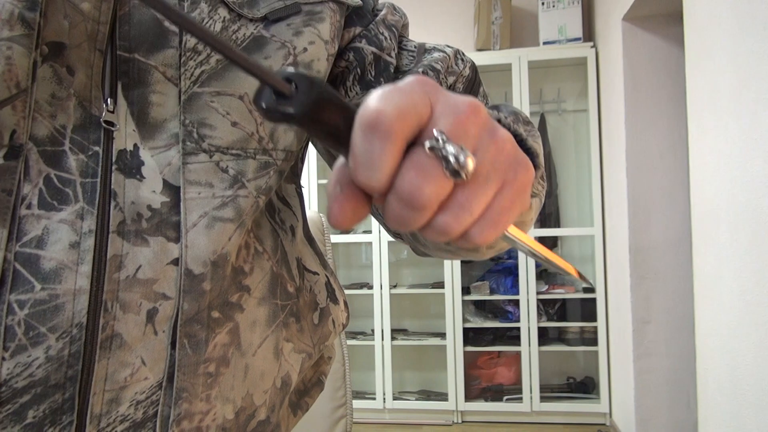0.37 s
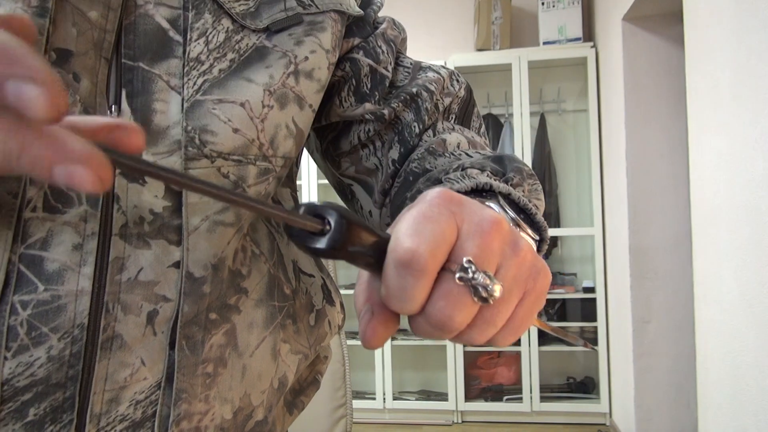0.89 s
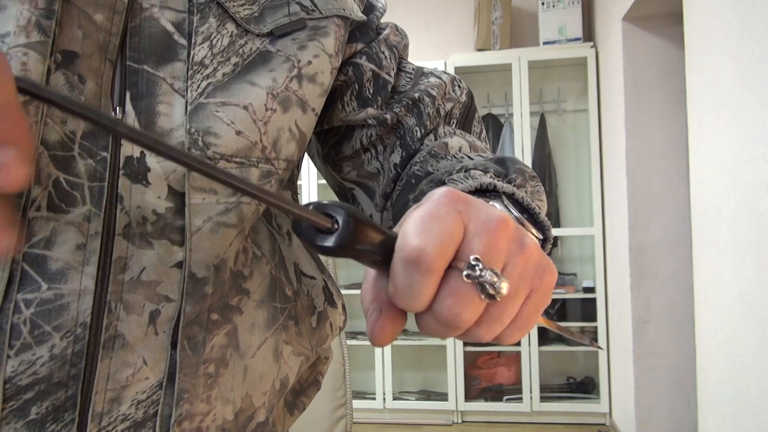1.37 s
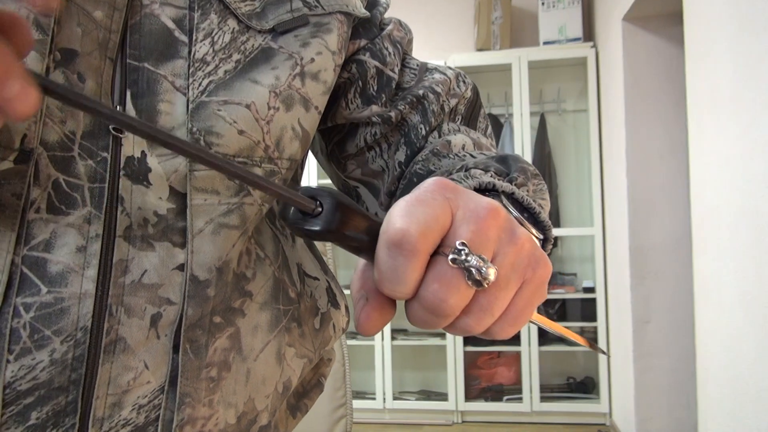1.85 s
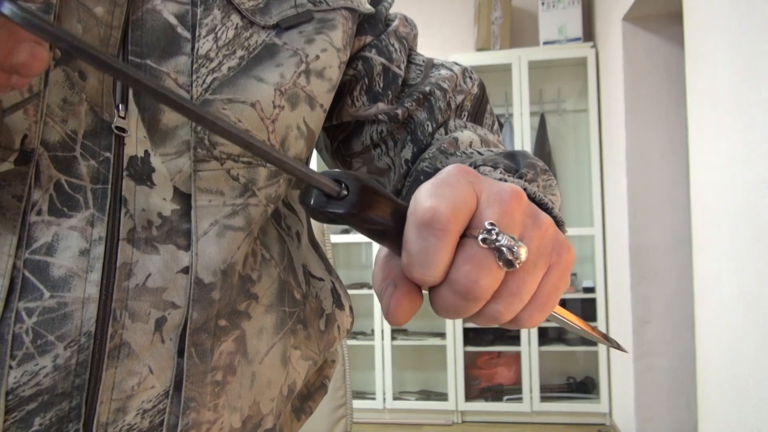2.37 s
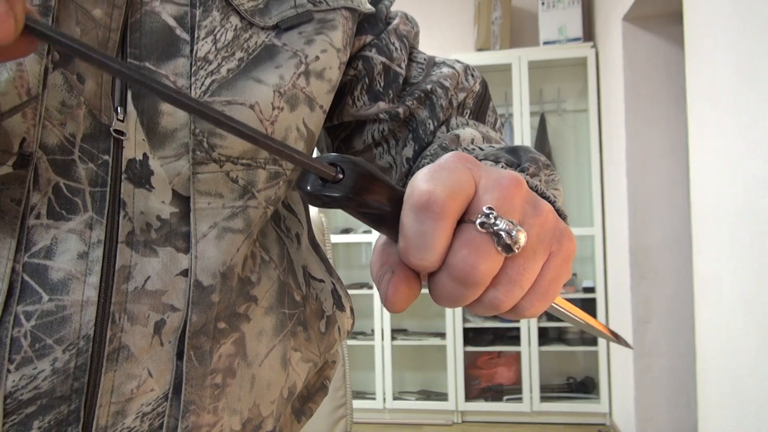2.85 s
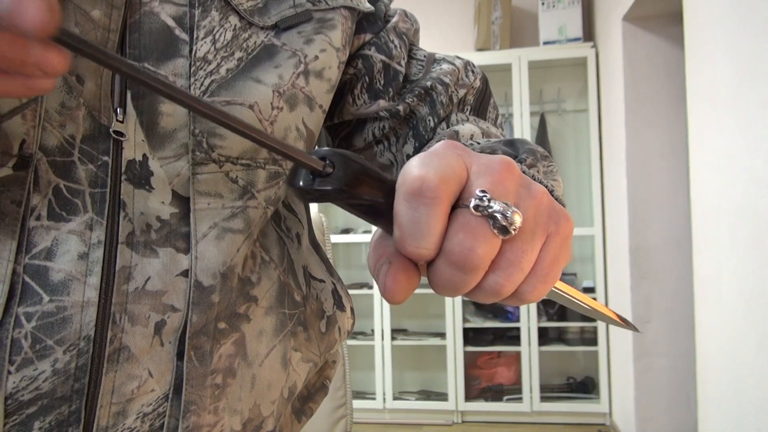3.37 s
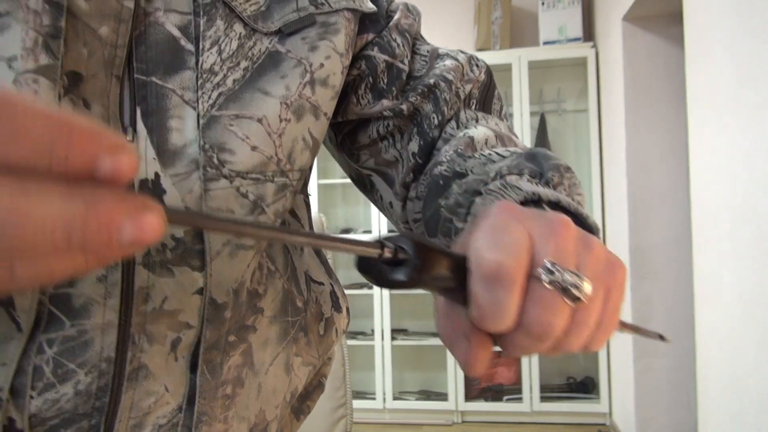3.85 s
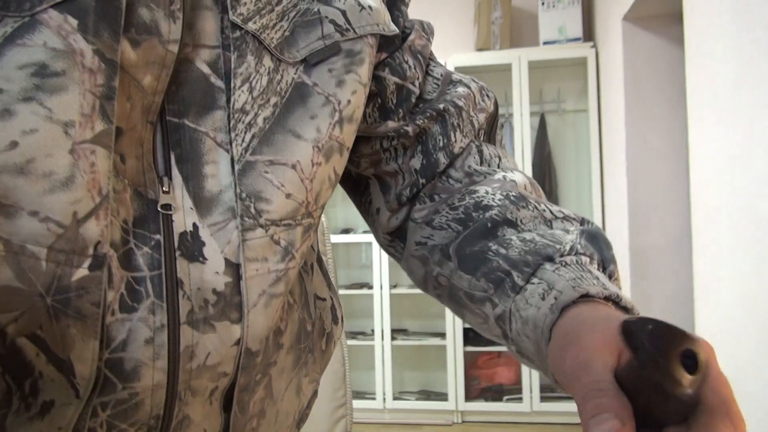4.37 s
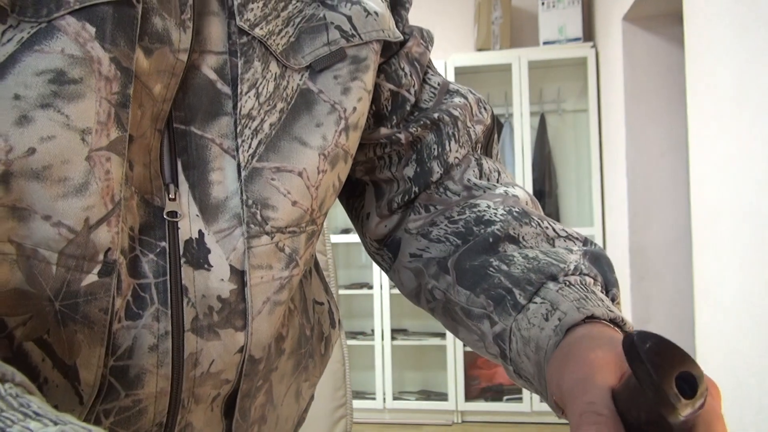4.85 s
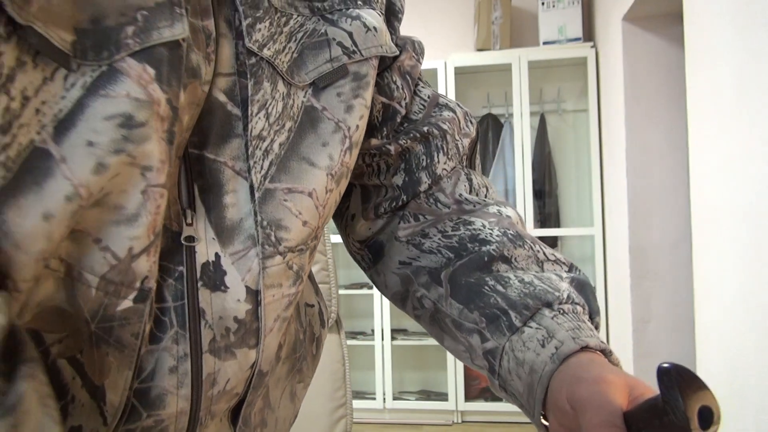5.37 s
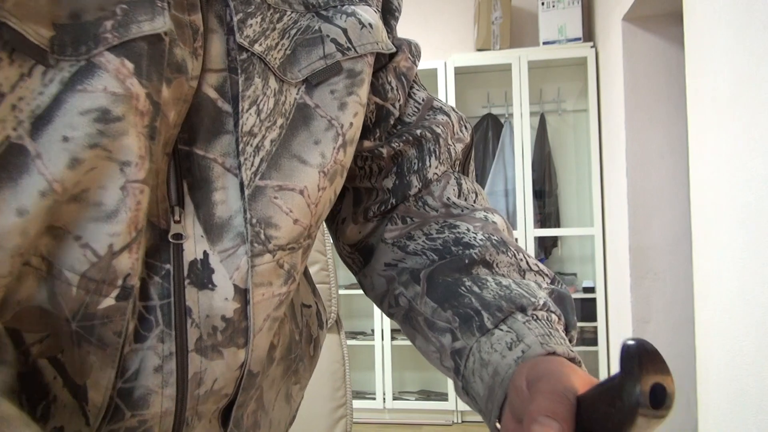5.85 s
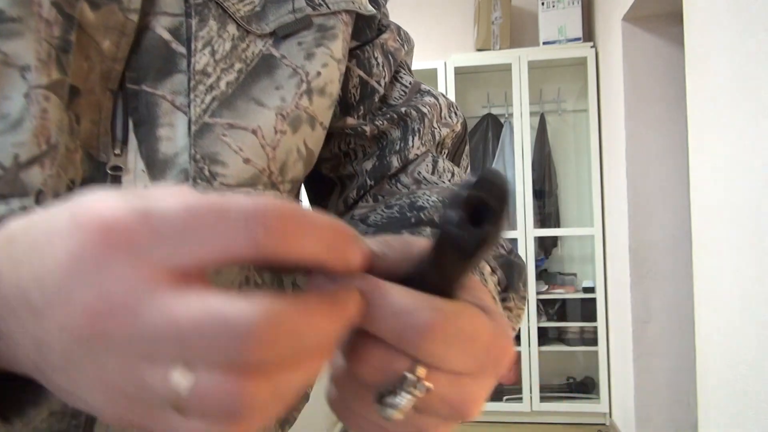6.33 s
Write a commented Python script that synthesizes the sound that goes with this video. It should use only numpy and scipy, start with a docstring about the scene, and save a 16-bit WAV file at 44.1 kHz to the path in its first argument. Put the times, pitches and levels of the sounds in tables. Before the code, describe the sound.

In a quiet indoor room with a steady low hum, a hex key turns in a bolt close to the microphone: tiny gritty scrapes, finger hiss and dry ticks, one clearly sharper. A thin squeak and a small ringing chink follow as it comes loose. A jacket sleeve swishes softly, then the key is laid on a wooden table with sudden loud knocks, scraping slides and short metallic ringing.

```python
"""Hands turn a long steel hex key in a bolt in a quiet room: room noise and hum lines last throughout.
First come scrapes (random grit through socket resonances), finger hiss and ticks (clicks with a short ring).
Near 3.9 s and 4.9 s a thin squeak joins, the later one with a chink of the loose key; from 5.1 s a jacket
sleeve swishes, as smooth filtered noise. From 5.5 to 6.05 s the key is laid on a wooden table: knocks and
slides shake the wood, each knock starts the steel's fading tones afresh, and two dull thumps lie below."""
import sys
import numpy as np
from scipy import signal
from scipy.fft import rfft, irfft
from scipy.io import wavfile
from scipy.ndimage import uniform_filter1d, minimum_filter1d

SR = 44100
rng = np.random.default_rng(int(sys.argv[2]) if len(sys.argv) > 2 else 0)


def master(y):
    """Save y as 16-bit WAV."""
    cut = np.clip(np.atleast_2d(y).T, -1, 1)
    pcm = np.round(cut * 32767)  # scale
    wavfile.write(sys.argv[1], SR, pcm.astype(np.int16))


def voltage_ratio(level):
    """Linear amplitude factor for a level in decibels (scalar or array-like)."""
    return 10 ** (np.asarray(level, float) / 20)


N = 285327

# colour of the room noise: f/Hz, relative level per Hz/dB
AIR_COLOUR = [(15, -39), (25, -9), (55, -1.5), (80, -6.5), (102, -2), (157, -1), (263, -12.5), (545, -20),
              (591, -28), (659, -21), (1020, -30), (1480, -30), (2690, -35), (5280, -34), (16000, -43.5)]
# hum of appliances: f/Hz, rms level/dB, width of the wavering part/Hz, steady share of the power/0-1
HUM_LINES = [(150.5, -49, 6.4, 0.66), (168.4, -53.5, 19, 0.86), (230.5, -60, 4.9, 0.03),
             (297.3, -58.5, 13.3, 0.59), (598.4, -62, 11, 0.92), (701, -68.5, 2.4, 0.9),
             (1164, -72.5, 14, 0.17), (1524, -65.5, 266, 0.02), (15622, -80, 3, 1)]
# how alike left and right noise are: f/Hz, likeness/0-1
LIKENESS = [(60, 0.98), (380, 0.97), (2380, 0.94), (15000, 0.9)]
# balance of noise and hum: f/Hz, left minus right/dB
BALANCE = [(60, -4.5), (380, 0.5), (2380, 1), (15000, 0.5)]
# colour of the jacket cloth: f/Hz, relative level/dB
CLOTH_COLOUR = [(800, -0.5), (2000, 1), (4000, -1.5), (6500, 2.5), (9000, -6), (16000, -18)]
# low thumps of the heavier knocks through the table frame: t/s, peak level of the swell/dB
KNOCK_THUMPS = [(5.797, -29), (5.935, -39)]
# strokes of key and rubbing fingers: start t/s, length/s, socket scrape level/dB, skin-on-steel hiss level/dB
STROKES = [(0.0, 0.02, -56, -54), (0.059, 0.026, -55, -66), (0.106, 0.022, -58, -80),
           (0.263, 0.061, -62, -58), (0.346, 0.05, -65, -60), (0.431, 0.058, -55, -55.5),
           (0.495, 0.086, -64, -66), (0.604, 0.055, -62, -78), (0.858, 0.051, -65, -59.5),
           (1.165, 0.021, -68, -70), (1.27, 0.032, -64, -75), (1.332, 0.16, -60, -57.5),
           (1.434, 0.027, -52, -50), (1.581, 0.056, -56, -56.5), (1.613, 0.11, -61, -67),
           (1.768, 0.1, -57.5, -61), (1.85, 0.105, -60.5, -64), (2.236, 0.14, -62.5, -65),
           (2.406, 0.083, -58.5, -59), (2.544, 0.03, -57, -62), (2.621, 0.081, -54, -51),
           (2.776, 0.079, -58.5, -59.5), (2.869, 0.16, -53.5, -67), (3.049, 0.084, -50, -59),
           (3.232, 0.035, -42.5, -54), (3.261, 0.069, -51.5, -56.5), (3.401, 0.046, -57, -58),
           (3.506, 0.048, -58.5, -80), (3.608, 0.044, -58.5, -80), (3.69, 0.083, -58.5, -79),
           (3.826, 0.18, -56, -66), (4.218, 0.19, -60.5, -66), (4.926, 0.057, -60, -57)]
# resonances of the key in the bolt head: f/Hz, width/Hz, relative level/dB
SOCKET_MODES = [(2450, 500, -4), (3100, 500, -9), (5440, 450, 2), (6800, 1800, -7)]
# thin squeaks of steel on steel: start t/s, length/s, level/dB, f/Hz
STEEL_SQUEAKS = [(3.862, 0.056, -54, 7750), (4.925, 0.057, -53, 7840)]
# ticks of the key in the bolt, the last a chink of the loose key:
# t/s, peak level of the click without its ring/dB, centre f/Hz
KEY_TICKS = [(0.449, -38, 2480), (1.603, -42, 3000), (2.646, -27, 5760), (2.796, -39, 7000),
             (2.9547, -39, 5400), (2.969, -28, 5530), (3.0757, -12.5, 5330), (3.0846, -26, 6500),
             (3.243, -37, 5500), (3.284, -34, 5400), (3.423, -28, 5130), (3.692, -37, 4600),
             (3.716, -41, 6000), (3.738, -31.5, 2300), (3.8017, -33, 3400), (3.871, -28.5, 7760),
             (4.9638, -30.5, 7600)]
# tones of the steel key: f/Hz, relative level/dB, time to fall 60 dB when free/s, family of vibration/0-2
KEY_MODES = [(861, -10, 2.1, 1), (2008, -11, 1.6, 1), (3885, 0, .22, 0), (7415, 0, .5, 1),
             (11712, 0, .46, 0), (15716, -16, .24, 0), (4605, -4, .3, 2), (5795, -10, .25, 2),
             (8046, 0, .4, 2), (12350, -5, .35, 2)]
# pushes along the wood: start t/s, end t/s, first pressure level/dB, last pressure level/dB,
# starting brightness/dB, note of the top under the key f/Hz, extra boom at that spot/dB
PUSHES = [(5.479, 5.518, -19.5, -27, 1, 667, 3.5), (5.535, 5.61, -15, -19, 2, 681, -1),
          (5.63, 5.733, -39.5, -46, 9, 620, -9), (5.768, 5.801, -10.5, -14, 8.5, 602, -16),
          (5.813, 5.898, -15.5, -17, 15.5, 672, 2), (5.905, 5.942, -17.5, -22.5, 13.5, 640, -4.5),
          (5.945, 6.04, -16, -18.5, 7.5, 677, -5.5)]
# flats of the key landing: t/s, relative strength level/dB, ring level of steel families 0, 1 and 2/dB
LANDINGS = [(5.477, -4.5, -33.5, -56, -58), (5.529, -9, -32.5, -59, -67), (5.55, -9.5, -43, -47, -70),
            (5.652, -42, -56, -73, -75), (5.766, -11, -48, -39, -45), (5.779, -22, -34, -32, -25.5),
            (5.807, -13, -46, -42, -47), (5.822, -21, -43, -55, -52), (5.845, -22, -32.5, -28, -40),
            (5.863, -11, -30.5, -26, -42), (5.894, -29, -33, -37, -45), (5.919, -12, -46, -49, -45),
            (5.944, -18.5, -38, -52, -48), (5.956, -10.5, -35, -52, -50), (5.979, -14.5, -32, -47, -53),
            (6.009, -16.5, -35.5, -50, -52), (6.045, -47, -40, -43.5, -52)]
# further resonances of the wooden top, low and high: f/Hz, width/Hz, relative level/dB
WOOD_MODES = [(114.6, 26, 1), (208, 31, -1.5), (870, 83, -3), (1100, 75, -6), (1225, 39, -4.5),
              (1617, 69, 3), (1970, 38, 4), (2225, 24, 2.5), (2398, 43, 0.5)]
# colour of the broad rasp on wood: f/Hz, relative level per Hz/dB
RASP_COLOUR = [(35, -78), (70, -8), (300, -8), (650, 2.5), (2600, -9.5), (3100, -14), (7400, -22.5),
               (10000, -41), (16000, -50)]
# how long the room rings: f/Hz, time to fall 60 dB/s
ROOM_DECAY = [(200, 0.67), (1000, 0.33), (4000, 0.38), (12000, 0.11)]


def evened(x):
    """Scales a sound to an average (rms) strength of 1."""
    return x / np.sqrt(np.mean(x ** 2) + 1e-20)


def read(points, hz):
    """Reads a curve between its points, with pitch spaced as the ear hears it (log frequency)."""
    f, value = np.transpose(points)
    return np.interp(np.log(hz + 1), np.log(f + 1), value)


def add(mix, s, sound):
    """Adds a sound to the mix at time s in seconds, cut off at the end."""
    part = mix[round(s * SR):][:len(sound)]
    part += sound[:len(part)]


def resonate(x, hz, width):
    """A resonance: answers most near one pitch, with gain 1 there; the pitch may follow a curve."""
    turn = np.exp(2j * np.pi * np.cumsum(hz * np.ones(len(x))) / SR)
    r = np.exp(-np.pi * width / SR)
    return 2 * (turn * signal.lfilter([1 - r], [1, -r], x / turn)).real


def band(x, low_hz, high_hz, order=2):
    """Keeps mainly what lies between two frequencies."""
    return signal.sosfilt(signal.butter(order, [low_hz, high_hz], "band", fs=SR, output="sos"), x)


def colour(x, points):
    """Filters with the given spectrum, without sounding ahead of its input."""
    log_gain = np.log(voltage_ratio(read(points, abs(np.fft.fftfreq(4096, 1 / SR)))))
    taps = np.fft.ifft(np.exp(np.conj(signal.hilbert(log_gain)))).real[:2048]
    return signal.oaconvolve(x, taps)[:N]


def grit(per_s, spread_db):
    """Rough surfaces catching: random clicks of either sign, a few of them large."""
    size = voltage_ratio(spread_db * np.minimum(rng.exponential(1, N), 4)) * rng.choice([-1., 1.], N)
    return evened(size * (rng.random(N) < per_s / SR))


def air():
    """Broad room noise, nearly alike left and right, with hum lines that are part steady, part wavering."""
    hz, t = np.fft.rfftfreq(N, 1 / SR), np.arange(N) / SR
    left, other = rfft(rng.standard_normal((2, N)))
    same = np.clip(read(LIKENESS, hz), -1, 1)
    right = same * left + np.sqrt(1 - same ** 2) * other
    spectrum = np.array([left, right]) * voltage_ratio(read(AIR_COLOUR, hz))
    sound = voltage_ratio(-44.5) * evened(irfft(spectrum, N))
    for f, db, width, steady in HUM_LINES:
        waver = evened(resonate(resonate(rng.standard_normal(N), f, width), f, width))
        steady = np.clip(steady, 0, 1)
        tone = np.sqrt(2 * steady) * np.sin(2 * np.pi * f * t)
        sound = sound + voltage_ratio(db) * (tone + np.sqrt(1 - steady) * waver)
    return irfft(rfft(sound) * voltage_ratio(np.outer([.5, -.5], read(BALANCE, hz))), N)


def room(x):
    """Sparse reflections, partly shared by left and right, each band dying at its own speed."""
    taps = np.zeros((2, SR // 2))
    # one reflection at a random place in every 20 samples
    at = np.arange(200, SR // 2 - 20, 20) + rng.integers(0, 20, (2, (SR // 2 - 201) // 20))
    np.put_along_axis(taps, at, rng.choice([-1., 1.], at.shape), 1)
    taps[1] = .75 * taps[0] + .66 * taps[1]
    hz, t, z = signal.stft(taps, SR, nperseg=256)
    fading = z * voltage_ratio(-60 * t / read(ROOM_DECAY, hz)[:, None])
    tail = signal.istft(fading, SR, nperseg=256)[1]
    return signal.fftconvolve(x[None], tail / np.linalg.norm(tail[0]), axes=1)[:, :N]


def sleeve():
    """A smooth swish of jacket cloth, made of filtered noise: it swells, holds and stops."""
    start_s, top_s, end_s = 5.115, 5.22, 5.51
    level_db, rise_db = -51, 9
    t = np.arange(N) / SR
    swell_db = rise_db * np.minimum((t - top_s) / (top_s - start_s), 0)
    gate = (t > start_s) * np.clip((end_s - t) / 0.12, 0, 1)
    return gate * voltage_ratio(level_db + swell_db) * evened(colour(rng.standard_normal(N), CLOTH_COLOUR))


def thumps():
    """Heavier knocks sound through the table frame: dull low thumps that swell quickly and die away."""
    out, t = np.zeros(N), np.arange(SR // 4) / SR
    thump_hz, swell_s = 36, 0.0077
    for s, db in KNOCK_THUMPS:
        swell = np.e * t / swell_s * np.exp(-t / swell_s)
        add(out, s, voltage_ratio(db) * swell * np.sin(2 * np.pi * thump_hz * t))
    return out


def rubbing():
    """Fine grit sounds the socket; fingers sliding on the shaft add a bright hiss."""
    drive = grit(per_s=1400, spread_db=3.8)
    socket = evened(band(sum(voltage_ratio(db) * resonate(drive, f, w) for f, w, db in SOCKET_MODES), 1660, 6100))
    hiss = evened(band(grit(per_s=7000, spread_db=2.8), 5000, 17000))
    # faint restless contact throughout, under and between the strokes; it halves from 3.85 to 4.35 s
    restless = evened(band(rng.standard_normal(N), 2, 12, order=1))
    scrape = voltage_ratio(-77 + 5 * restless) * np.clip(3.85 + 1 - np.arange(N) / SR, .5, 1)
    slide, strokes = np.zeros((2, N))
    # each stroke seats the key differently, shifting the socket's resonances
    seat_share, seat_db = .06, 6
    seats = rng.uniform(-1, 1, (len(STROKES), len(SOCKET_MODES), 2))
    for (s, length, scrape_db, slide_db), seat in zip(STROKES, seats):
        stroke = signal.windows.tukey(round(length * SR), .6)
        grains = drive[round(s * SR):][:len(stroke)]
        seated = sum(voltage_ratio(db + seat_db * b) * resonate(grains, f * (1 + seat_share * a), w)
                     for (f, w, db), (a, b) in zip(SOCKET_MODES, seat))
        add(strokes, s, voltage_ratio(scrape_db) * stroke * evened(band(seated, 1700, 6900)))
        add(slide, s, voltage_ratio(slide_db) * stroke)
    squeak_width_hz = 350
    for s, length, db, hz in STEEL_SQUEAKS:
        once = resonate(drive[:SR // 4], hz, squeak_width_hz)
        thin = resonate(once, hz, squeak_width_hz)
        stroke = signal.windows.tukey(round(length * SR), .6)
        add(strokes, s, voltage_ratio(db) * stroke * evened(thin)[-len(stroke):])
    return scrape * socket + slide * hiss + strokes


def steel(t, grip, family_db, start=0):
    """The key's tones dying away; a grip below 1 shortens them by that share."""
    return sum(voltage_ratio(db + family_db[k] - 60 * t / (t60 * grip)) * np.sin(2 * np.pi * f * (t + start))
               for f, db, t60, k in KEY_MODES)


def ticks():
    """Each tick is a noisy click through its own resonance, plus a short ring of the gripped steel."""
    out, t = np.zeros(N), np.arange(4000) / SR
    for (s, db, hz), noise in zip(KEY_TICKS, rng.standard_normal((len(KEY_TICKS), 4000))):
        drive = (noise + 2 * (t == 0)) * (np.exp(-t / .0006) + .12 * np.exp(-t / .008))
        body = resonate(resonate(drive, hz, 3300), hz, 3300) + 0.32 * drive
        body = band(body, 1500, hz + 3000, order=3)
        # choked while seated in the bolt, open once loose after 4.6 s
        ring_db = 3.5 if s > 4.6 else -42
        ring = steel(t, .1, [ring_db - 13, ring_db - 8, ring_db])
        ring = band(ring, 4300, 20000, order=4)
        add(out, s, voltage_ratio(db) * (body / abs(body).max() + ring))
    return out


def pushes(t):
    """The strongest push rules pressure, brightness, note and boom; the key hops before each knock."""
    s0, s1, first_db, last_db, edge_db, note_hz, boom_db = np.transpose(PUSHES)[:, :, None]
    touch, lift, dulling = 1514, 800, 95  # dB per second: landing, leaving and losing brightness
    held_db = first_db + (last_db - first_db) * np.clip((t - s0) / (s1 - s0), 0, 1)
    level_db = held_db - touch * np.maximum(s0 - t, 0) - lift * np.maximum(t - s1, 0)
    ruling = level_db.argmax(axis=0)
    start = s0[ruling, 0]
    bright_db = edge_db[ruling, 0] - dulling * np.clip(t - start, 0, .2)
    bright_db = bright_db - touch * np.clip(start - .004 - t, 0, .02)
    times = np.array([row[0] for row in LANDINGS] + [2 * N / SR])
    upcoming = np.searchsorted(times, t)
    until = times[upcoming] - t
    since = t - times[np.maximum(upcoming - 1, 0)]
    knock_edge_db = 6.5 * np.exp(-abs(since) / 0.0088)
    hop_db = -6.5 * np.clip(2 - 2 * until / 0.0065, 0, 1)
    smooth_note_hz = uniform_filter1d(note_hz[ruling, 0], size=400)
    return level_db.max(axis=0) + hop_db, bright_db + knock_edge_db, smooth_note_hz, boom_db[ruling, 0]


def key_on_table():
    """Drag grit and knocks shake the wooden top; each knock damps the steel and sets it ringing anew."""
    t = np.arange(N) / SR
    drag_db, bright_db, note_hz, boom_db = pushes(t)
    drive, ring = grit(per_s=3600, spread_db=3.1) * voltage_ratio(drag_db), np.zeros(N)
    ends = [row[0] for row in LANDINGS[1:]] + [N / SR]
    rattles = rng.standard_normal((len(LANDINGS), 600))
    regrip_s = .003  # the old ring gives way to the new one over this time
    for (s, db, *family_db), end, noise in zip(LANDINGS, ends, rattles):
        add(drive, s, voltage_ratio(db - 2) * noise * np.exp(-t[:600] / 0.0088))  # rattle
        add(drive, s, voltage_ratio(db + 4) * signal.windows.hann(13))  # first blow
        since = t[:round((end - s + regrip_s) * SR)]
        fade = np.clip(np.minimum(since, since[::-1]) / regrip_s, 0, 1)
        add(ring, s, steel(since, 1, family_db, round(s * SR) / SR) * fade)
    # pressed on the wood, the steel's middle modes ring broadly under the grit
    grinding = band(drive * voltage_ratio(bright_db), 3000, 8500, order=3)
    pressed = sum(resonate(grinding, f, 25) for f, *_ in KEY_MODES if 3000 < f < 7500)
    scale = 1 / np.std(colour(grit(per_s=5000, spread_db=0), RASP_COLOUR))
    low, high = (signal.butter(4, 2800, kind, fs=SR, output="sos") for kind in ("low", "high"))
    # the wood's further resonances waver slowly at random
    waver = 1 + .025 * evened(band(rng.standard_normal(N), 3, 20, order=1))
    wood = sum(voltage_ratio(db) * resonate(drive, f * waver, w) for f, w, db in WOOD_MODES)
    # the top's two strong modes: the note under the key, and the boom
    note = voltage_ratio(13) * resonate(drive, note_hz, 36)
    boom = resonate(drive * voltage_ratio(11.5 + boom_db), 408.5, 14.8)
    wood = wood + note + boom
    # a bright push lifts the rasp fully above 2800 Hz, but only by a share below
    low_rasp = signal.sosfilt(low, drive * voltage_ratio(0.32 * bright_db))
    high_rasp = signal.sosfilt(high, drive * voltage_ratio(bright_db))
    broad = scale * colour(low_rasp + high_rasp, RASP_COLOUR)
    return voltage_ratio(7) * signal.sosfilt(low, wood) + voltage_ratio(-6.5) * pressed + voltage_ratio(-7.5) * broad + ring


def scene():
    """Hands a little to the right, table in the middle, both with room reflections over the room noise."""
    hands = rubbing() + ticks() + sleeve()
    table = key_on_table() + thumps()
    placed_hands = hands * voltage_ratio(np.array([[-.7], [.7]]))
    reflections = room(voltage_ratio(-25.0) * hands + voltage_ratio(-14.5) * table)
    return placed_hands + table + reflections + air()


def band_limit(x):
    """A steep low-pass at the top of the band."""
    return signal.sosfilt(signal.butter(12, 16100, fs=SR, output="sos"), x)


def record(dry):
    """Gain control turns loud sounds down and recovers slowly; a quick limiter holds the peaks."""
    power_db = 10 * np.log10(abs(uniform_filter1d((dry ** 2).mean(0), 300)) + 1e-12)
    fall = np.arange(N) * 31.0 / SR  # the remembered loudness sinks 31 dB a second
    remembered_db = np.maximum.accumulate(power_db + fall) - fall
    over_db = np.maximum(remembered_db + 15.5, 0)
    ducked = dry * voltage_ratio(-.25 * uniform_filter1d(over_db, 200))
    ceiling, catch_s = 0.6, 0.002  # highest level, reaction time
    span = round(catch_s * SR)
    room_left = np.minimum(ceiling / (abs(ducked).max(0) + 1e-9), 1)
    lowest = minimum_filter1d(room_left, 2 * span)
    held = ducked * uniform_filter1d(uniform_filter1d(lowest, span), span)
    return band_limit(held)


dry = scene()
out = record(dry)
master(out)
```